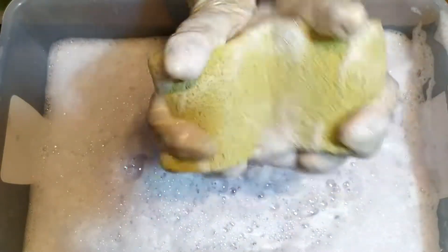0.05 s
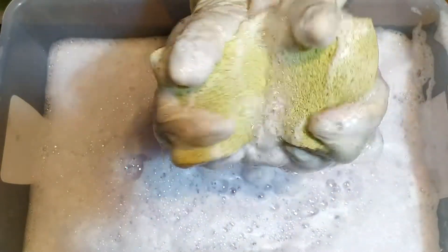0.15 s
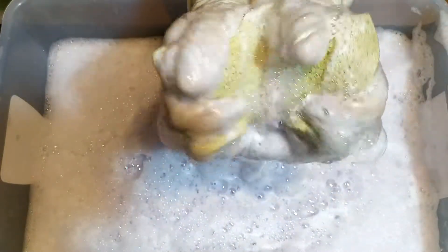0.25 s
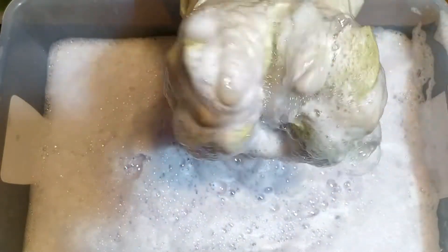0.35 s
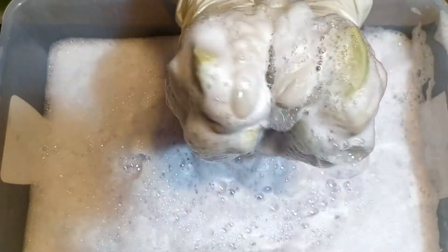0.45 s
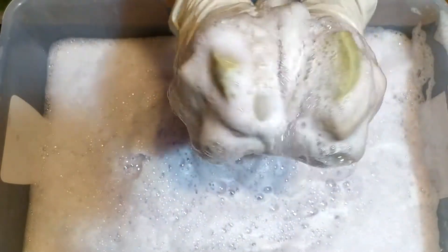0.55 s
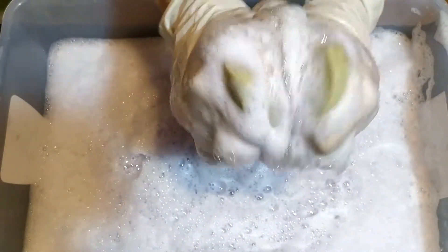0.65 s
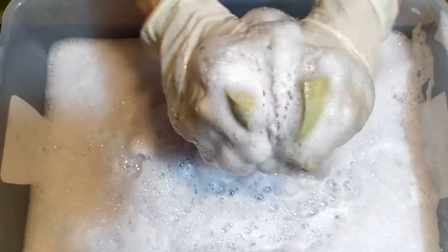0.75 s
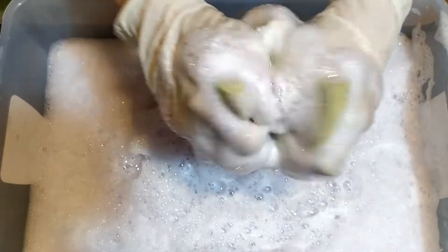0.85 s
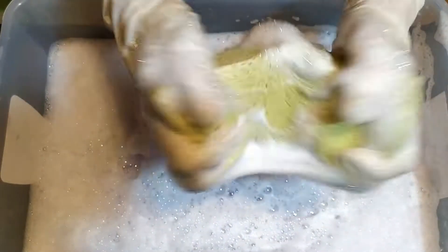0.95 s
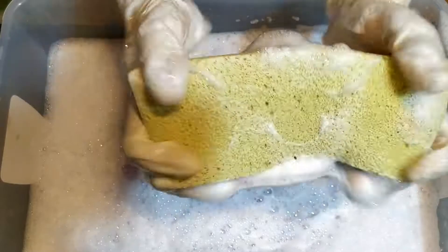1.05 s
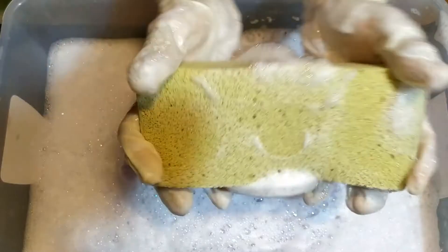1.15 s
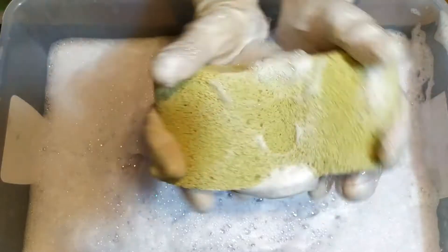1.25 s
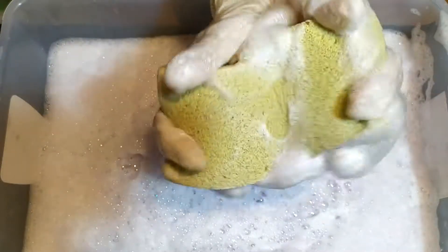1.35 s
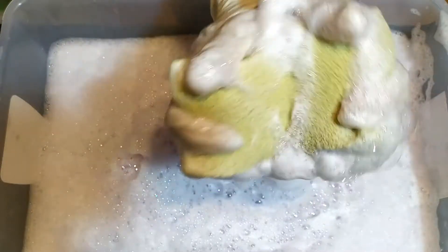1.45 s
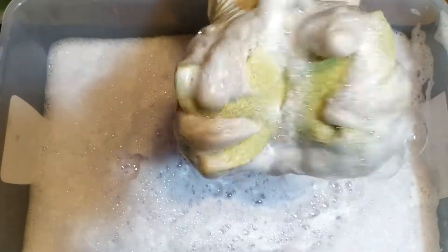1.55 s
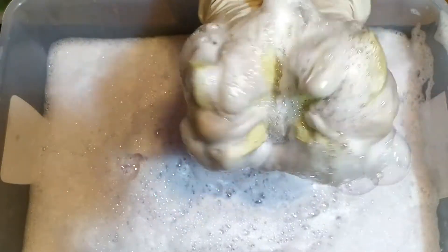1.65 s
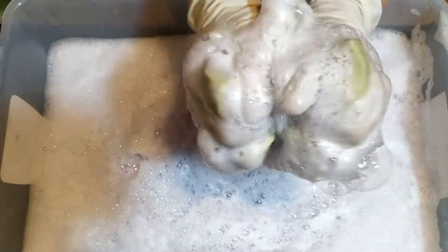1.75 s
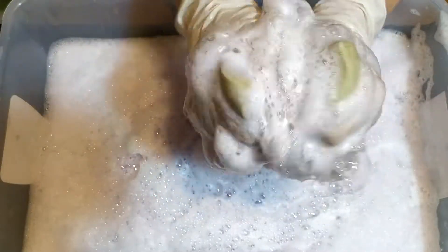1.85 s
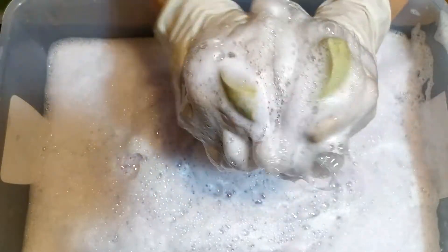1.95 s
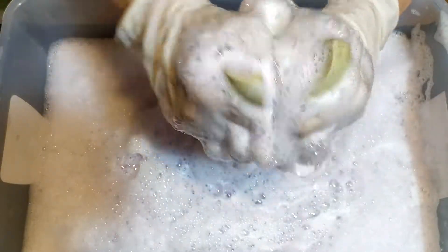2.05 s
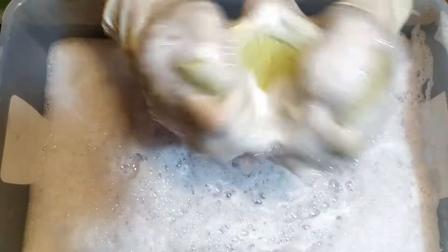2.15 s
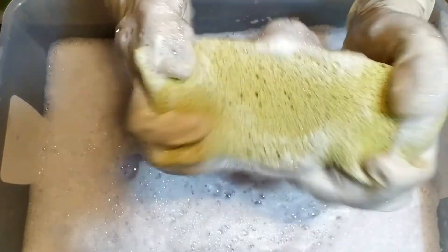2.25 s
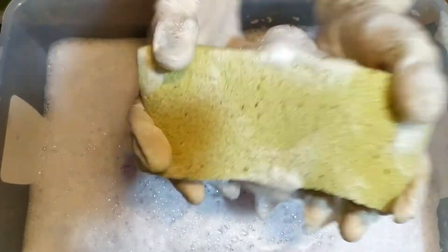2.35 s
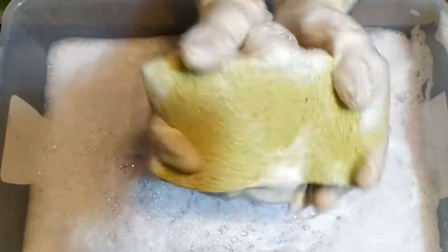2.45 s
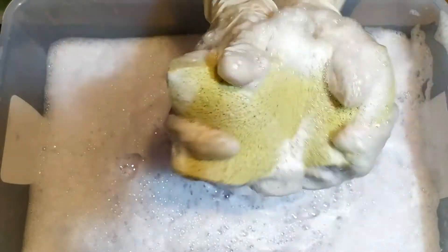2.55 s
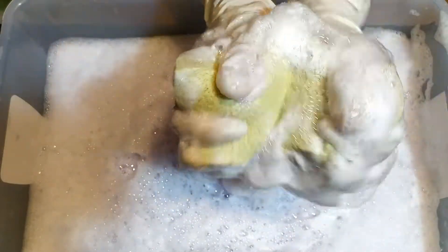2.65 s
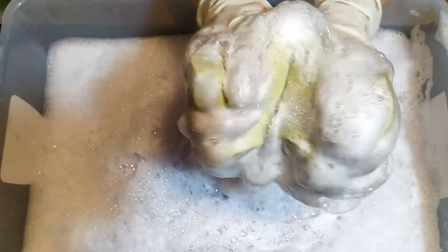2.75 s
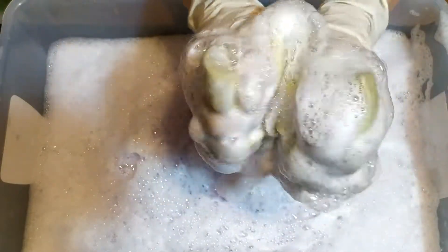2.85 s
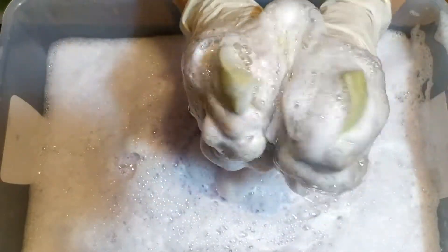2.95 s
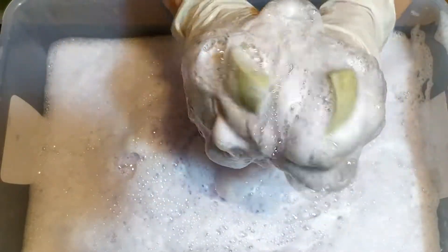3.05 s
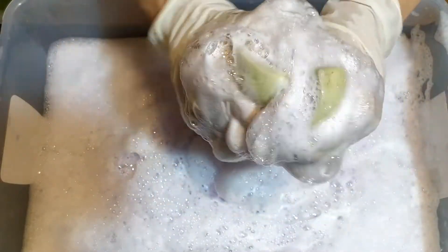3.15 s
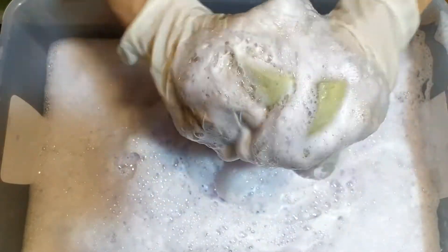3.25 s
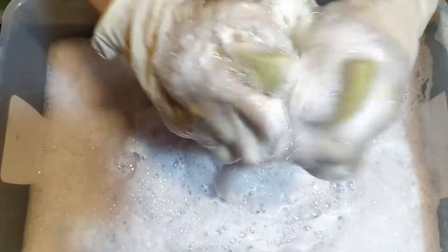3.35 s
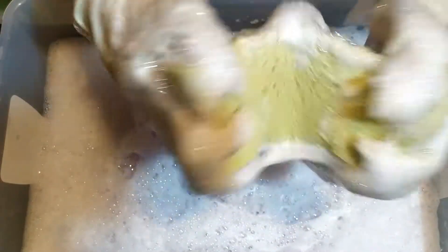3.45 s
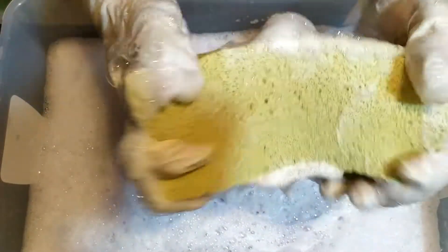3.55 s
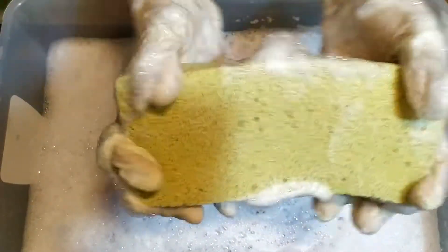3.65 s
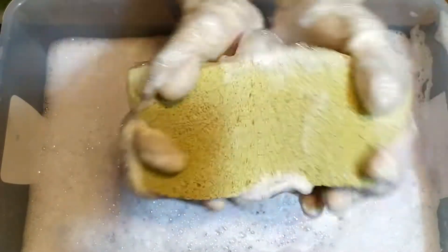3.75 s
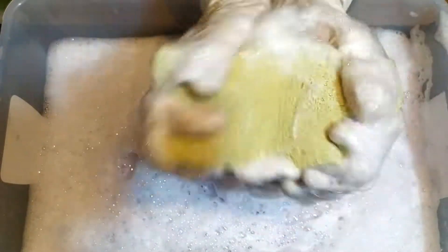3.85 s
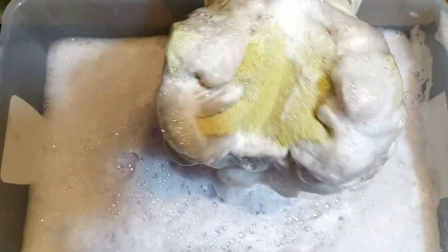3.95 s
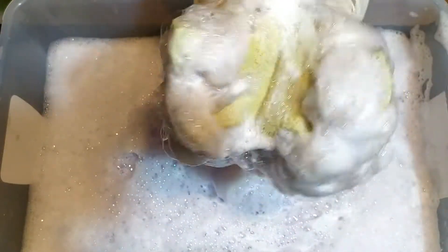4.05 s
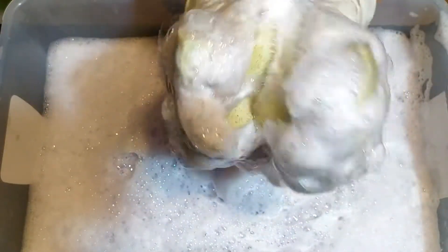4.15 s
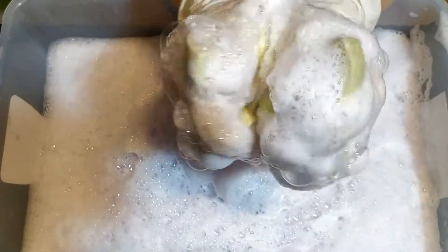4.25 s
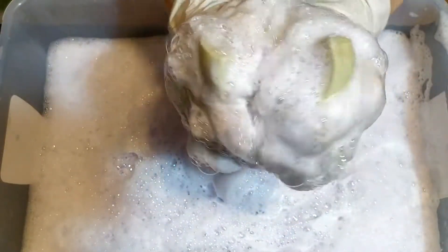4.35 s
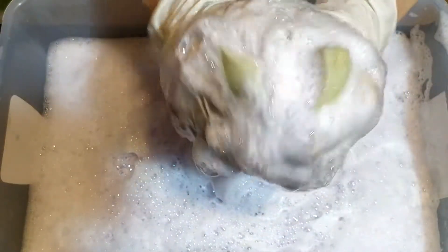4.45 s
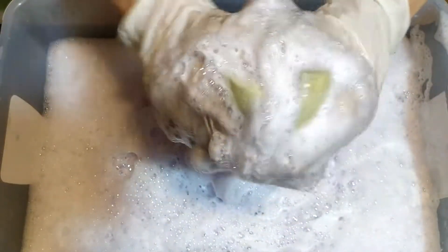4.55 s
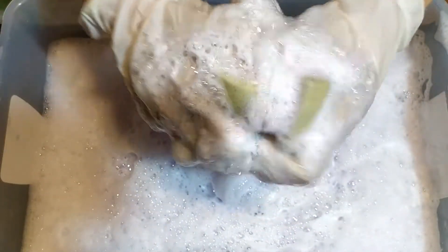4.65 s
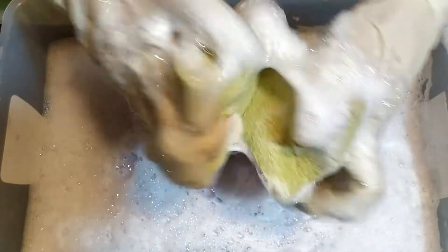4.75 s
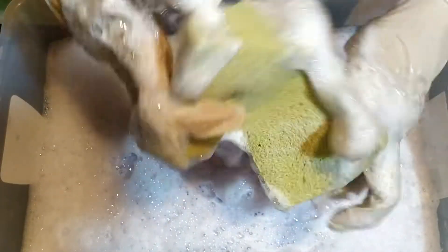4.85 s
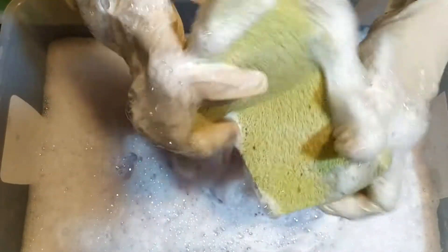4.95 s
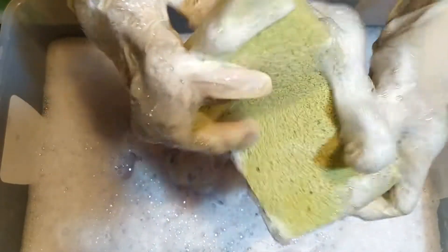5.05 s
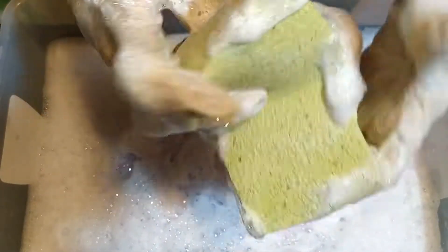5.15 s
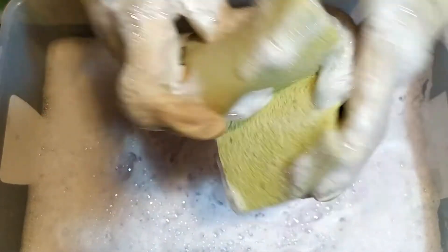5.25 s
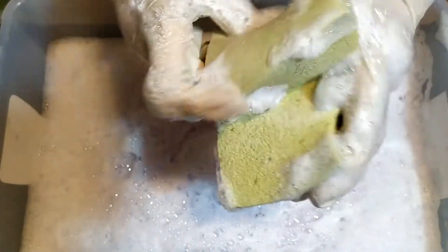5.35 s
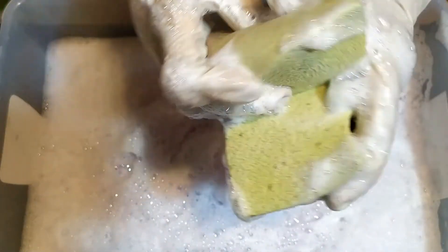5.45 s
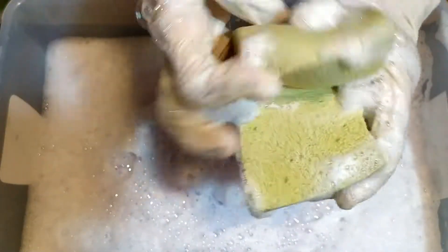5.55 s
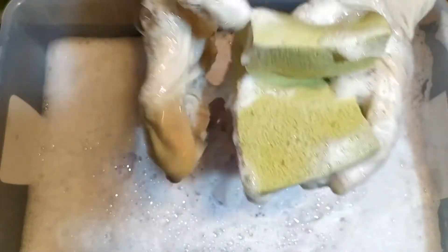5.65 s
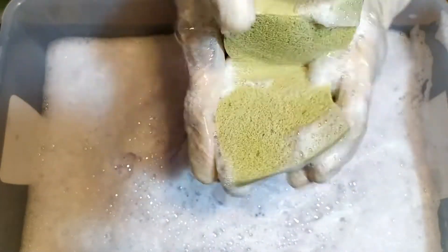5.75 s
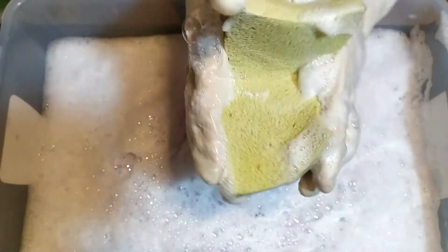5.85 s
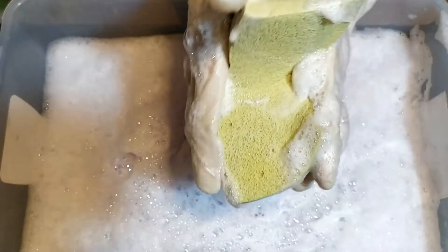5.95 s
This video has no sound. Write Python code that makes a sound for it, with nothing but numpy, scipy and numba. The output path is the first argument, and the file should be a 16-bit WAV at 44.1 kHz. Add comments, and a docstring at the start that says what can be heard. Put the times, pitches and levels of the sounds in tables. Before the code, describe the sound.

A foamy sponge is kneaded close to the microphone over a plastic tub. From 0 to 0.6 s a squeeze gives dense, crackling fizz in several pushes, with a small spurt and thud near 0.4. As the sponge opens, from 0.6 to 1.15 s, water drums on the tub with hollow low thuds and quick rising plops. Fizz swells again from 1.1 to 1.9 s, with a tiny bright snap at 1.4. The strongest gush, thick with plops and knocks, runs from 1.95 to 2.4 s; another small snap follows near 2.46. Squeezing fizz peaks around 2.3 and 2.7 to 3.0 s, then water pours from 3.0 to 3.7 s. A loud soft-edged squelch swells by 4.2 s, with a last sizeable gush from 4.4 to 4.9. Short squishy rubs, slips and sparse drops finish by 6 s. Thin suds crackle, faint 100 Hz hum and low rumble continue throughout.

```python
"""Soapy sponge squeezed over a plastic tub

Gloved hands squeeze and release a sponge close to a mono microphone. Thousands of short rising tones are
the foam's bubbles bursting, over the thin crackle of suds. Random blows ring the tub as water drums on it,
with single heavier slugs. Single drops plop as short rising tones, the low ones with a knock, and two soap
films snap as bright, falling ones. A faint mains hum and filtered-noise rumble lie underneath."""
import sys
import numpy as np
from scipy import signal
from scipy.fft import rfft, irfft, next_fast_len
from scipy.io import wavfile
from scipy.ndimage import uniform_filter1d
from numba import njit

SR = 44100
rng = np.random.default_rng(int(sys.argv[2]) if len(sys.argv) > 2 else 0)


def master_out(mix):
    """Clip the mix to full scale and print it as 16-bit PCM to the path in sys.argv[1]."""
    frames = np.transpose(np.atleast_2d(mix))
    ceiling = np.clip(frames, -1, 1)
    pcm = np.round(ceiling * 32767).astype(np.int16)
    wavfile.write(sys.argv[1], SR, pcm)


N = 264159  # length of the scene in samples
CONTROL_STEP = 64  # samples between control values


def undb(db):
    """Turn a level in dB into a gain."""
    return 10 ** (np.asarray(db) / 20)


def unit(x):
    """Scale a sound to rms 1."""
    return x / np.sqrt(np.mean(x ** 2))


def mix_db(*levels):
    """Add the powers of unrelated sounds to get their level in dB when heard together."""
    power = sum(undb(2 * db) for db in levels)
    return 10 * np.log10(power + 1e-20)


def clock():
    """Times in seconds at which the slow levels are worked out."""
    return np.arange(0, N + CONTROL_STEP, CONTROL_STEP) / SR


def smooth(db):
    """Join the control values by straight lines, one level per sample."""
    return np.interp(np.arange(N) / SR, clock(), db)


def walk(rate):
    """Random wandering with a spread near 1: levels held 1 / rate s, then smoothed twice."""
    hold = int(SR / rate)
    steps = np.repeat(rng.standard_normal(N // hold + 1), hold)
    slewed = uniform_filter1d(uniform_filter1d(steps, hold), hold)
    return 1.3 * slewed[:N]


def band(x, hz, width):
    """Two-pole resonance with gain 1 at its centre."""
    b, a = signal.iirpeak(hz, hz / width, fs=SR)
    return signal.lfilter(b, a, x)


@njit
def grains(n, start, hz, t60, size, glide):
    """Decaying sines whose pitch moves by the factor glide over their life; a bubble's pitch rises."""
    out = np.zeros(n)
    for k in range(len(start)):
        life = int(t60[k] * SR) + 2
        fade = np.exp(-np.log(1000) / life)  # down 60 dB by the end
        phase = 0.
        level = size[k]
        for i in range(min(life, n - start[k])):
            phase += 2 * np.pi * hz[k] * (1 + (glide - 1) * i / life) / SR
            opening = min(phase / np.pi, 1.)  # opens over half a cycle
            out[start[k] + i] += level * opening * np.sin(phase)
            level *= fade
    return out


def bubbles(count, lo_hz, hi_hz, cycles, spread_db, colour=None):
    """Rising bursts at random moments between two pitches, a few much louder than the rest; rms 1."""
    when, pitch, luck = rng.random((count, 3)).T
    hz = lo_hz * (hi_hz / lo_hz) ** pitch
    db = -spread_db * np.log(1 - luck)
    if colour is not None:
        # equal counts an octave and lives of 1 / hz: size must grow with pitch for a flat spectrum
        colour_db = np.interp(np.log(hz), np.log(colour[:, 0]), colour[:, 1])
        db = db + colour_db + 20 * np.log10(hz)
    start = (when * N).astype(np.int64)
    return unit(grains(N, start, hz, cycles / hz, undb(db), 1.335))


RISE_POWER = 1.17  # over 1 a stroke starts more softly


def stroke(start, rise, hold, fade_db, level_db):
    """Pressure builds along a quarter sine, holds, then the fizz fades at a steady rate in dB."""
    t = clock() - start
    build = np.sin(np.pi / 2 * np.clip(t / max(rise, 1e-3), 1e-9, 1))
    fade = fade_db * np.maximum(t - rise - hold, 0)
    return level_db + RISE_POWER * 20 * np.log10(build) - fade


# Swells of fizz as the hands work the sponge: long squeezes (some in two pushes), quieter fizz while it
# opens, re-grips, short finger slips and small rubs at the end. Each row: start in seconds, rise in seconds,
# hold in seconds, fade in dB per second, fine fizz level in dB, coarse bubbles over fine in dB.
STROKES = [(-.05, 0.037, 0.018, 90, -52.5, -3), (0.17, 0.13, .03, 40, -61, -6.5),
           (0.298, 0.13, 0.017, 31, -50.5, -2.5), (0.398, 0.14, 0.094, 67, -49.5, -4.5),
           (0.71, 0.14, 0.058, 62, -57.5, -0.5), (0.912, 0.028, .005, 202, -55.5, -9),
           (0.963, 0.021, 0.013, 201, -64, -1), (1.109, 0.097, 0.0092, 100, -53, -2.5),
           (1.215, 0.084, .02, 56, -51, -6.5), (1.321, 0.025, 0.0087, 122, -56, 1.5),
           (1.585, 0.045, 0.046, 65, -54.5, -2), (1.678, 0.086, .02, 51, -50, -5),
           (1.783, .13, 0.067, 70, -48, -5.5), (2.02, 0.14, 0.065, 52, -59.5, 3),
           (2.172, 0.033, .005, 119, -56.5, 1.5), (2.305, 0.26, 0.062, 173, -50.5, -4),
           (2.445, .015, .003, 400, -66, -8), (2.689, 0.26, 0.13, 51, -49, -4),
           (3.084, 0.13, 0.1, 53, -62, 5.5), (3.328, 0.11, 0.18, 41, -61.5, 1),
           (3.629, 0.046, .005, 152, -54.5, 2), (3.697, 0.075, 0.029, 67, -51, -5),
           (3.884, .05, .02, 200, -63.5, -0.5), (4.02, 0.23, .01, 29, -47, -5.5),
           (4.238, 0.2, 0.091, 57, -53.5, -0.5), (4.662, 0.065, 0.033, 48, -67.5, 6),
           (4.845, 0.19, 0.049, 51, -54, -2), (4.99, 0.044, .005, 150, -59, 6),
           (5.237, .025, 0.011, 95, -60.5, 0.5), (5.298, 0.11, 0.015, 100, -60, -2),
           (5.444, 0.067, 0.026, 300, -57, -5.5), (5.555, 0.11, 0.0092, 162, -54, -4),
           (5.732, 0.087, 0.15, 300, -57.5, -13), (5.819, 0.068, .01, 160, -64.5, 10.5)]
IDLE_DB, IDLE_COARSE_DB = -67, -4.5  # fizz between strokes, and its coarse bubbles over fine


def pressing():
    """Levels of fine and coarse fizz: all strokes over a little constant fizz."""
    strokes = [(stroke(*row[:5]), row[5]) for row in STROKES]
    strokes += [(IDLE_DB, IDLE_COARSE_DB)]
    fine_db = mix_db(*[db for db, _ in strokes])
    coarse_db = mix_db(*[db + rel_db for db, rel_db in strokes])
    return fine_db, coarse_db


# How loud the fizz is at each pitch, before each layer is scaled to rms 1.
# Each row: frequency in Hz, relative level in dB per Hz.
FIZZ = [(350, -37), (600, -7), (735, -10.5), (1190, 7), (1730, -1), (2330, 4), (5710, 6.5), (7700, 5),
        (10000, -25.5), (16900, -120)]
# Air between hands and tub, which resonates with the fizz.
# Each row: frequency in Hz, width in Hz, gain at the centre in dB.
CUP = [(1450, 54, -11), (2340, 110, -14), (3450, 180, -8), (4320, 170, -15.5)]


def foam(fine_db, coarse_db):
    """Fine and coarse bubbles burst in the pores; sparse sticky ones stand out, in uneven patches."""
    colour = np.array(FIZZ, float)
    fine = bubbles(count=80000, lo_hz=2340, hi_hz=8190, cycles=10.8, spread_db=1.88, colour=colour)
    coarse = bubbles(count=30000, lo_hz=830.0, hi_hz=2710, cycles=6.7, spread_db=0.27, colour=colour)
    sticky = bubbles(count=1500, lo_hz=940.0, hi_hz=3290, cycles=6.8, spread_db=3.0)
    coarse = coarse + undb(-9.5 + 3.2 * walk(25.09)) * sticky
    patches = undb(0.61 * walk(17))
    fine_part = undb(fine_db + 1.03 * walk(16)) * fine
    coarse_part = undb(coarse_db + 1.0 * walk(4.69)) * coarse
    fizz = patches * (fine_part + coarse_part)
    return fizz + sum(undb(db) * band(fizz, hz, width) for hz, width, db in CUP)


BED_HZ, BED_WIDTH_HZ, BED_DB = 7260, 12000, -74  # finest bubbles: centre, width, average level


def bed():
    """The suds in the tub crackle on, thin and high: random clicks through one wide resonance."""
    crackle = band(drops(4000, 2.4), BED_HZ, BED_WIDTH_HZ)
    return undb(BED_DB + 1.1 * walk(21)) * unit(crackle)


HUM_HZ, HUM_DB = 100, -60  # the level is the middle of a slow wander
# Low noise of the room. Each row: centre in Hz, width in Hz of a resonance used twice, rms level in dB.
RUMBLE = [(65, 22, -62), (102.3, 22, -65), (163, 38, -75.5)]


def room():
    """Mains hum, a sine that wavers a little in level, and low rumble in a few bands of noise."""
    tone = np.sqrt(2) * np.sin(2 * np.pi * HUM_HZ * np.arange(N) / SR)  # rms 1
    hum = tone * undb(HUM_DB + 1.3 * walk(5))
    rumble = np.zeros(N)
    for hz, width, db in RUMBLE:
        noise = band(band(rng.standard_normal(N), hz, width), hz, width)
        rumble += undb(db) * unit(noise)
    return hum + rumble


def curves(table):
    """Level of one gush, silent outside it, and its other columns added to that level."""
    s, level_db, *rel_db = np.transpose(table)
    level_db = np.interp(clock(), s, level_db, -200, -200)
    return [level_db] + [level_db + np.interp(clock(), s, rel) for rel in rel_db]


# Water running into the tub: long gushes as the sponge opens, short spurts as a squeeze begins.
# One table a gush. Each row: time in seconds, drumming level of light drops in dB,
# heavy slugs over light drops in dB, splash over light drops in dB.
GUSHES = [
    [(.34, -77, -5, 0), (.385, -53.5, 5, -21), (.44, -74, -4, 2)],
    [(.56, -73, -8, -7), (.63, -56.5, -22, -17), (.72, -51.5, -0.5, -9), (.77, -53.5, -7, -8),
     (.81, -54.5, -13, -5), (.89, -46, -1, -7.5), (.93, -50, 1, -10), (1.0, -50, -4, -7.5),
     (1.03, -44.5, 2, -20), (1.08, -48, 7, -8), (1.12, -60, 3, -9), (1.15, -56, 1, -1), (1.24, -75, 11, 8)],
    [(1.3, -78, -10, -3), (1.37, -63, -13, -6), (1.44, -82, -8, 2)],
    [(1.64, -70, -1, 12), (1.69, -62.5, 11, -15), (1.76, -77, 13, -2)],
    [(1.86, -73, -9, -13), (1.95, -51, -23, -12), (2.02, -50.5, -18, -1), (2.08, -46.5, -11, -17),
     (2.15, -43, -1, -8), (2.19, -40, -7, -7.5), (2.22, -43.5, 2, -10), (2.26, -42.5, -2, -7.5),
     (2.32, -43.5, -3, -19), (2.38, -45.5, 0, -8), (2.55, -72, 5, 6.5)],
    [(2.79, -71, 3, 0), (2.835, -68, 1, -17), (2.89, -72, 8, -4)],
    [(2.94, -64.5, 7, 1), (3.0, -58.5, -13, -4.5), (3.15, -45, -9, -11), (3.25, -60, 3, -6),
     (3.28, -46, -2.5, -6), (3.35, -52.5, -9, -2.5), (3.375, -45.5, 7, -13), (3.47, -42, -0.5, -12.5),
     (3.59, -49, 2.5, -4), (3.74, -66, -16, -3), (3.84, -74, -6, 0)],
    [(4.06, -80, 5, -6), (4.17, -62.5, 9, -10), (4.34, -62, -10, -2), (4.45, -53.5, -5, -7),
     (4.57, -50.5, -8.5, -10), (4.65, -49.5, -2, -5), (4.69, -55, 8, -3), (4.77, -47, 0.5, -12),
     (4.85, -50, -2, -9), (4.89, -54.5, 2, -4.5), (5.04, -62.5, -6, -3.5), (5.12, -64.5, -2, -7)],
    [(5.77, -70, -3, -9), (5.83, -65, -9, -11), (5.87, -61.5, -12, 10), (5.97, -86, 8, 5)],
]
# dripping when the hands rest: light drops, then heavy and splash over light
TRICKLE_DB, TRICKLE_HEAVY_DB, TRICKLE_SPLASH_DB = -69.5, 1.5, -1.5
# dripping wrung out by a stroke: light drops relative to its fine fizz, then heavy and splash over light
WRING_DB, WRING_HEAVY_DB, WRING_SPLASH_DB = -20.5, -0.5, 1.5


def runoff(press_db):
    """Levels of light drops, heavy slugs and splash: the gushes over a trickle that grows with pressure."""
    wrung_db = press_db + WRING_DB
    flows = [curves(gush) for gush in GUSHES]
    flows += [[TRICKLE_DB, TRICKLE_DB + TRICKLE_HEAVY_DB, TRICKLE_DB + TRICKLE_SPLASH_DB],
              [wrung_db, wrung_db + WRING_HEAVY_DB, wrung_db + WRING_SPLASH_DB]]
    return [mix_db(*layer) for layer in zip(*flows)]


def drops(rate, spread_db):
    """Impacts at random moments, rate of them a second, sizes widely scattered; rms 1."""
    hit, luck = rng.random((2, N))
    return unit((hit < rate / SR) * undb(-spread_db * np.log(1 - luck)))


def ring(blows, modes, push_s, sign=-1):
    """Soft blows, each a push of about push_s, ring the modes; sign -1 starts neighbours in opposite senses."""
    push = np.convolve(blows, np.hanning(int(push_s * SR) + 3))[:len(blows)]
    out = 0
    for k, (hz, db, t60) in enumerate(modes):
        width = np.log(1000) / np.pi / t60
        # the factor t60 makes up for the narrow band: longer rings are struck no weaker
        out = out + sign ** k * undb(db) * t60 * band(push, hz, width)
    return out


def drumming(level_db, rate, spread_db, modes, push_s):
    """Random drops whose ringing has the rms level of the curve."""
    blows = drops(rate, spread_db)
    steady = ring(blows, modes, push_s)
    return ring(blows * undb(level_db), modes, push_s) / np.std(steady)


# Ways the tub and its water vibrate, lowest first.
# Each row: frequency in Hz, relative level in dB, time to fade by 60 dB in seconds.
TUB = [(64, -14.5, 0.15), (116.1, 0, 0.26), (166.7, -5, 0.18), (215, -4, 0.13), (254, -5.5, 0.11),
       (284.6, -7.5, 0.15), (351, -10.5, 0.15), (395.7, -11.5, 0.25), (434, -7.5, 0.033),
       (555.7, -14.5, 0.18), (685, -15.5, 0.18), (781, -4.5, 0.048)]


def thud(push_ms):
    """Ring of the tub after one blow: the floor dips, all modes start together; peak 1."""
    blow = np.eye(1, SR // 3)[0]  # a single click
    x = -ring(blow, TUB, max(push_ms, .3) / 1000, sign=1)
    return x / np.abs(x).max()


# Single slugs of water landing in the tub.
# Each row: time in seconds, peak level in dB, length of the push in ms.
SLUGS = [(0.381, -44, 2.8), (0.643, -58, 2.4), (0.782, -43, 2.4), (0.913, -47, 3.4), (1.015, -37, 2.7),
         (1.057, -39.5, 3.1), (1.074, -33, 4.1), (1.097, -41, 4), (1.684, -42, 3.4), (2.074, -39, 2.8),
         (2.12, -34, 3.7), (2.155, -37.5, 4.2), (2.216, -40.5, 4), (2.292, -35, 3.5), (2.3, -37, 4.1),
         (2.317, -35.5, 3.1), (2.831, -42.5, 3.4), (3.265, -44, 2.3), (3.366, -36, 3.6),
         (3.434, -33.5, 2.5), (3.525, -40, 3.2), (4.558, -54, 2.7), (4.633, -39.5, 2.6), (4.838, -34, 3.2),
         (4.857, -35, 4.1)]


def slugs():
    """Each slug thuds in the tub; a longer push sounds deeper."""
    out = np.zeros(N + SR)
    for s, db, push_ms in SLUGS:
        x = thud(push_ms)
        start = int(s * SR)
        out[start:start + len(x)] += undb(db) * x
    return out[:N]


def tub(drum_db, heavy_db, splash_db):
    """Light drops ring the upper modes, heavy slugs the lowest three; bubbles splash along with the flow."""
    light = drumming(drum_db, rate=400, spread_db=1.6, modes=TUB[3:], push_s=0.0017)
    heavy = drumming(heavy_db, rate=300, spread_db=1.2, modes=TUB[:3], push_s=0.0046)
    splash = bubbles(count=2000, lo_hz=430.0, hi_hz=1330, cycles=7.3, spread_db=1.0)
    return light + heavy + undb(splash_db) * splash + slugs()


# Plops of single drops hitting the tub.
# Each row: time in seconds, level in dB that its parts are set from, pitch in Hz.
PLOPS = [(0.651, -35.5, 1080), (0.727, -35.5, 1130), (0.842, -29, 1155), (0.887, -38, 920),
         (0.9, -44, 1250), (0.971, -35, 1050), (1.015, -40, 960), (1.044, -36, 885), (1.97, -40, 797),
         (1.983, -36, 2280), (2.071, -32.5, 970), (2.116, -32, 785), (2.142, -31.5, 1440),
         (2.156, -31, 910), (2.1713, -25.5, 1020), (2.193, -38, 950), (2.207, -35, 1280), (2.229, -41, 767),
         (2.254, -38, 685), (2.289, -39, 870), (2.318, -44, 940), (2.4, -36.5, 806), (3.029, -43, 1270),
         (3.091, -43, 760), (3.139, -37, 665), (3.16, -39, 790), (3.1605, -39, 1550), (3.182, -35, 1210),
         (3.2643, -35, 930), (3.312, -41, 690), (3.343, -40.5, 690), (3.366, -33.5, 950), (3.4, -40, 390),
         (3.4354, -33.5, 980), (3.456, -34, 387), (3.473, -37, 395), (3.486, -38.5, 770), (3.508, -34, 760),
         (3.608, -51, 970), (3.675, -42, 1260), (3.692, -41, 1090), (4.598, -46, 786), (4.709, -36, 727),
         (4.735, -33, 874), (4.76, -31.5, 800), (4.787, -43, 1000), (4.804, -38.5, 745), (5.041, -37, 1200),
         (5.27, -40, 2050), (5.276, -41.5, 1150), (5.38, -43, 1600), (5.39, -45, 2050),
         (5.663, -36.5, 2230), (5.844, -44, 1160), (5.884, -41, 710)]
PLOP_CYCLES = 12.7  # cycles of that pitch until a plop has faded by 60 dB
# plops below this pitch also knock the tub: knock level relative to the plop's, length of the push
KNOCK_BELOW_HZ, KNOCK_DB, KNOCK_PUSH_MS = 1300, -7, 2.27


def plops():
    """Each drop gives a short rising tone with a partial above and below; the low ones also knock the tub."""
    s, db, hz = np.transpose(PLOPS)
    start = (s * SR).astype(np.int64)
    knocks = np.zeros(N)
    knocks[start] = undb(db + KNOCK_DB) * (hz < KNOCK_BELOW_HZ)
    tones = np.zeros(N)
    for ratio, rel_db in [(1.008, -2.0), (1.26, -14.5), (0.63, -15.0)]:
        tones += grains(N, start, ratio * hz, PLOP_CYCLES / hz, undb(db + rel_db), 1.19)
    # minus: the first swing of the tones is negative
    return signal.fftconvolve(knocks, thud(KNOCK_PUSH_MS))[:N] - tones


# Bright snaps of a soap film.
# Each row: time in seconds, level in dB that its modes are set from, size relative to the first.
SNAPS = [(1.391, -37, 1.0), (2.4595, -41.5, 0.87)]
# What a film of size 1 rings with.
# Each row: starting frequency in Hz, relative level in dB, time to fade by 60 dB in seconds.
FILM = [(1400, -6, .015), (2700, 0.5, 0.017), (3730, -4, .014)]


def snaps():
    """A film tears: a few bright modes that sink a little, higher and shorter for a smaller film."""
    s, db, scale = np.transpose(SNAPS)
    start = (s * SR).astype(np.int64)
    return sum(grains(N, start, hz / scale, t60 * scale, undb(db + rel_db), 0.95)
               for hz, rel_db, t60 in FILM)


# fizz that goes with running water: fine relative to the light drumming, then coarse over fine
SUCK_DB, SUCK_COARSE_DB = -28, 7


def scene():
    """Pressure drives fizz and dripping, running water adds fizz; one microphone, both channels alike."""
    fine_db, coarse_db = pressing()
    flow = runoff(fine_db)
    suck_db = flow[0] + SUCK_DB
    all_fine_db = mix_db(fine_db, suck_db)
    all_coarse_db = mix_db(coarse_db, suck_db + SUCK_COARSE_DB)
    fizz = foam(smooth(all_fine_db), smooth(all_coarse_db))
    water = tub(*map(smooth, flow))
    mono = fizz + bed() + water + plops() + snaps() + room()
    return np.tile(mono, (2, 1))


# A step down in the treble. Each row: frequency in Hz, gain in dB.
TREBLE_STEP = [(7550, -1.5), (7800, -7.5), (8000, -14), (8230, -21)]
TOP_HZ = 8330  # edge of the steep top cut
HISS_DB = -96  # level of the white noise before its band filter


def record(dry):
    """Bass roll-off, a step down in the treble, the steep top cut, and a trace of hiss above it."""
    bass_cut = signal.butter(3, 52, "high", fs=SR, output="sos")
    wet = signal.sosfilt(bass_cut, dry)
    size = next_fast_len(N)
    step_db = np.interp(np.fft.rfftfreq(size, 1 / SR), *np.transpose(TREBLE_STEP))
    wet = irfft(rfft(wet, size) * undb(step_db), size)[:, :N]
    top_cut = signal.ellip(10, .2, 60, TOP_HZ, fs=SR, output="sos")
    wet = signal.sosfilt(top_cut, wet)
    hiss_band = signal.ellip(4, .5, 8, [9700, 15800], "band", fs=SR, output="sos")
    hiss = signal.sosfilt(hiss_band, rng.standard_normal(N))
    return wet + undb(HISS_DB) * hiss


dry = scene()
out = record(dry)
master_out(out)
```